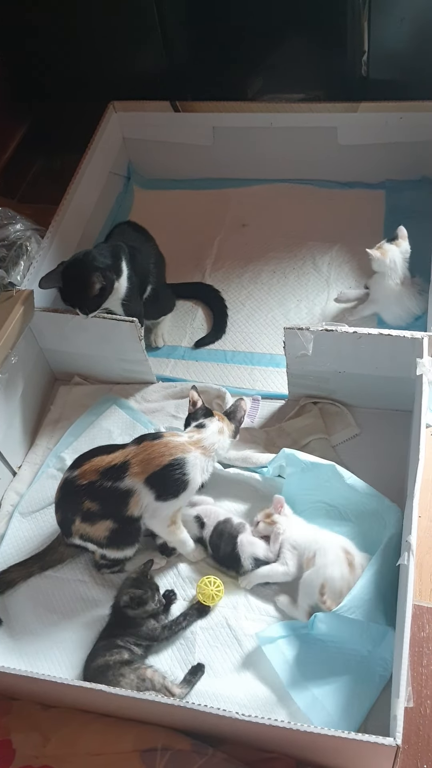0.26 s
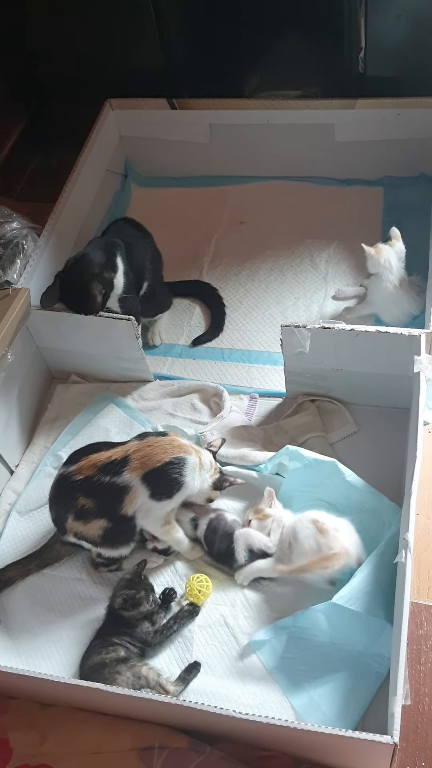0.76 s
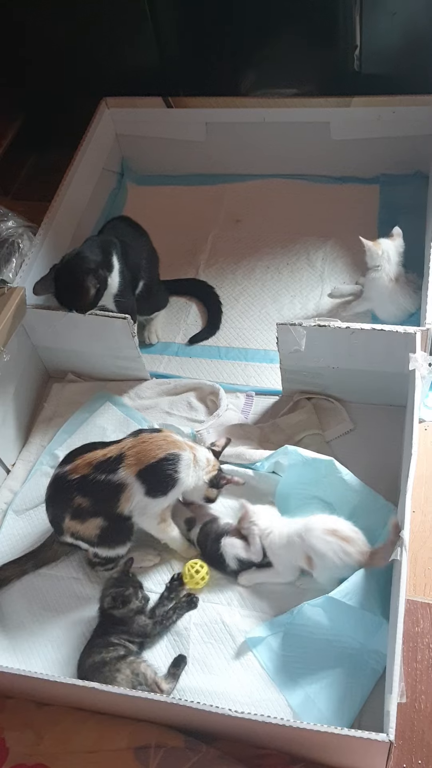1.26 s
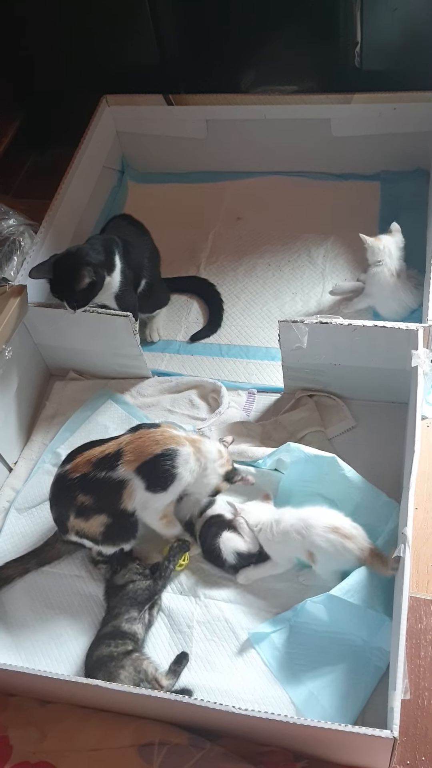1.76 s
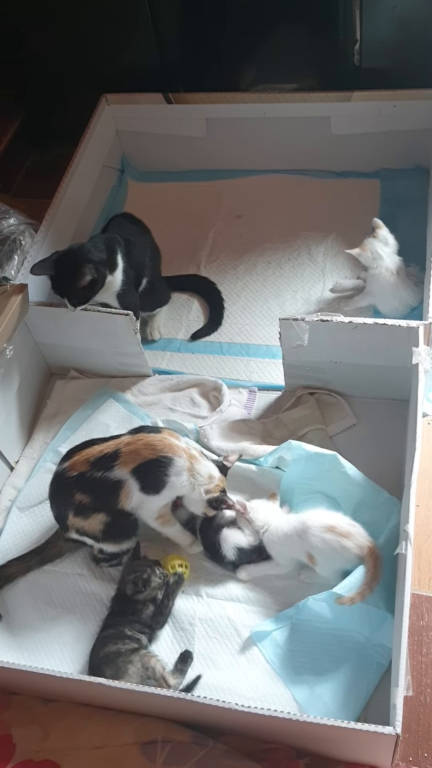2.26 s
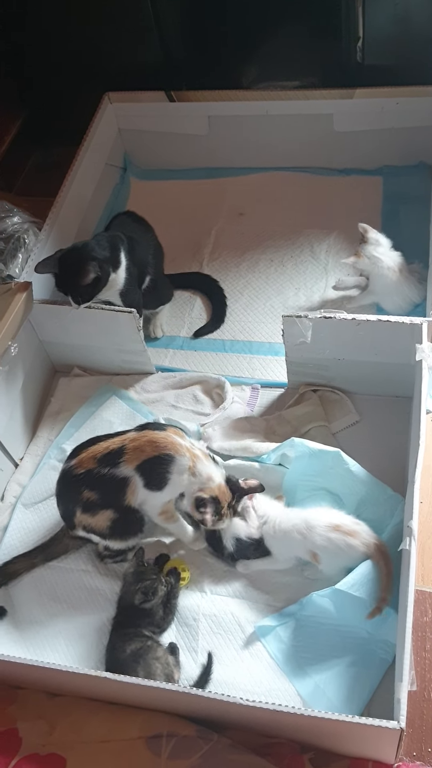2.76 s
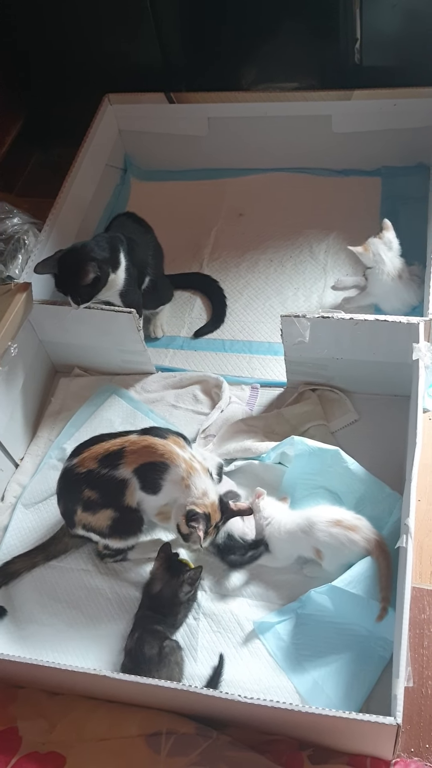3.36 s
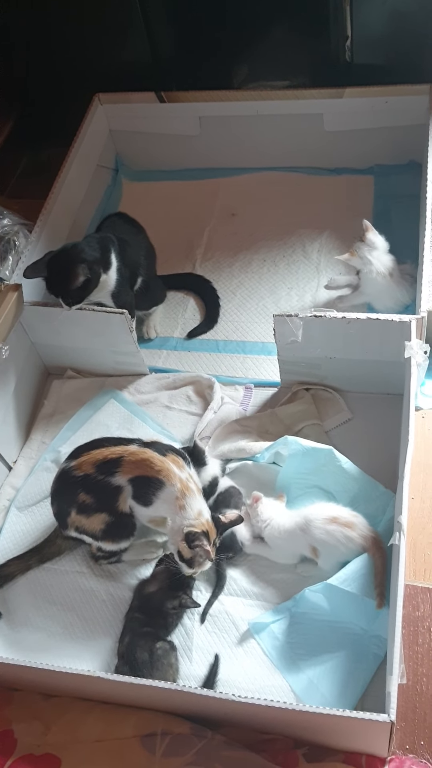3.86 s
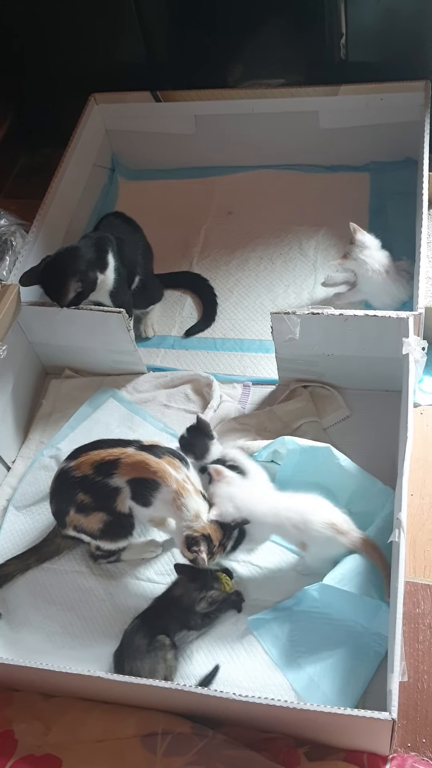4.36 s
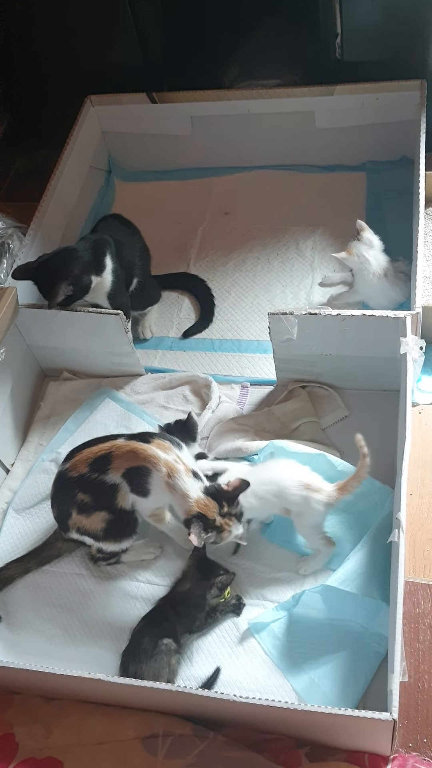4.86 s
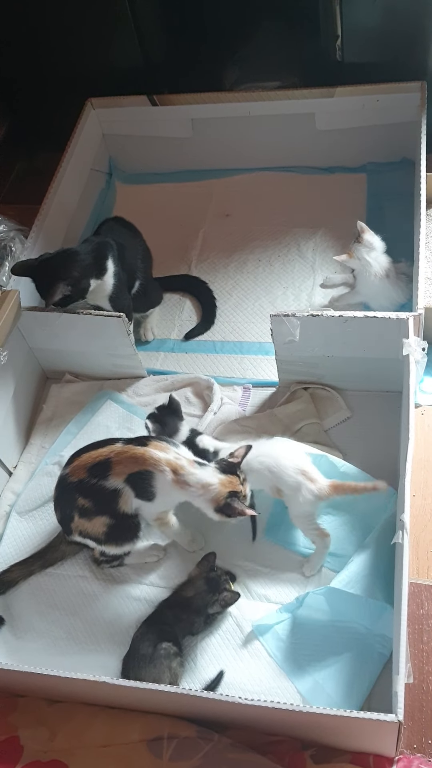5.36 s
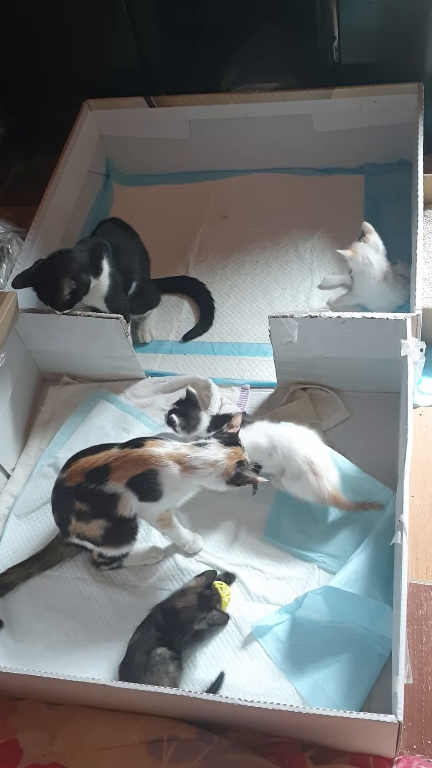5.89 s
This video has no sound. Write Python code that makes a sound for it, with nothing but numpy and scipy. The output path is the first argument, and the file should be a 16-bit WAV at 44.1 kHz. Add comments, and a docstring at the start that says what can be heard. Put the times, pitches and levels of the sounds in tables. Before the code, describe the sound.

Over the low hum of fans, kittens rustle on absorbent pads and knock a plastic bell ball, making light clinks and clacks.

```python
"""A pellet bell jingles inside a plastic lattice ball, batted by one of the kittens wrestling in a pen.
The pellet rings the bell and claws clack on the ball's cage. Paws and fur scuff crinkly absorbent pads,
the pen's cardboard is knocked and a dull rumble swells now and then. In the small room two motors,
probably fans, hum and beat against each other over a rush of air. The sound is stronger on the right."""
import sys
import numpy as np
from scipy import signal
from scipy.io import wavfile
from scipy.ndimage import uniform_filter1d

SR = 44100
rng = np.random.default_rng(int(sys.argv[2]) if len(sys.argv) > 2 else 0)


def wav_out(sig):
    """Save sig, one row per channel (or a flat mono array), as 16-bit PCM at SR to the path in sys.argv[1]."""
    wavfile.write(sys.argv[1], SR, np.round(np.clip(np.atleast_2d(sig).T, -1, 1) * 32767).astype(np.int16))


N = 270393
TIME = np.arange(N) / SR

# The bell's main note and its bright overtones. Each row: pitch in Hz, relative level in dB, t60 in seconds.
BELL_MODES = [(6000, -18, .18), (6490, -23, .12), (6828, 0, .105), (6845, -11, .16)]
OVERTONE_MODES = [(11570, -7, .11), (13480, -7, .09), (13620, -6, .1), (13820, 0, .13), (14100, -2.5, .13)]
# The pellet's dry tick. Each row: frequency in Hz, relative level in dB.
TICK_EQ = [(2000, -27), (5500, -15), (7500, 1), (11000, 2), (16000, -18)]


def ball():
    """The pellet strikes the bell and paws bat the cage; weaker bounces follow each blow."""
    # Hard pellet strikes. Each row: start in seconds, relative levels of main note and overtones in dB.
    jingles = [(0.1126, -56, -60), (0.183, -45.5, -62), (0.239, -47, -63), (0.3056, -46.5, -65),
               (0.3326, -43, -52.5), (0.671, -57, -63), (1.0166, -54.5, -61), (1.0831, -51, -58),
               (1.1348, -50, -58), (1.3614, -60, -58), (1.4193, -50.5, -70), (1.5048, -51, -68),
               (1.5337, -47.5, -50), (1.725, -50.5, -58), (1.7662, -70, -52), (1.8578, -59, -72),
               (2.0917, -60, -65), (2.4947, -52, -65), (2.5121, -39.5, -60), (2.5419, -44.5, -51),
               (2.6582, -50, -60), (2.708, -49.5, -60), (2.954, -64, -55), (2.9843, -47.5, -59),
               (3.0158, -48, -62), (4.2365, -52, -62), (4.2497, -47.5, -55), (4.366, -50, -58),
               (4.405, -50, -59), (4.513, -56, -51), (4.5556, -49, -62), (4.5919, -56, -71)]
    # Paw or claw hits. Each row: start in seconds, relative levels of cage ring and clack in dB.
    bats = [(.0994, -57, -72), (0.2705, -65, -51), (1.1147, -64, -70), (1.2742, -90, -54),
            (1.3614, -70, -58), (1.7262, -54.5, -56), (1.766, -56, -70), (1.8013, -59, -63),
            (2.5121, -68, -59), (2.5413, -55, -55), (2.6599, -59, -47), (2.7086, -60, -69),
            (2.954, -62, -57), (2.9853, -64, -63), (4.2527, -52.5, -44.5), (4.2746, -57.5, -66),
            (4.368, -52.5, -61), (4.556, -60.5, -47.5)]
    # A claw on plastic. Each row: frequency in Hz, relative level in dB.
    clack_eq = [(2000, -27), (3100, -16), (4600, 0), (7500, 2), (9500, 0), (13500, 3), (16000, -22)]
    bell, overtones, shell, ticks = rolling()
    for start, note_db, bright_db in jingles:
        add(bell, start, amp(note_db + 2) * ring(BELL_MODES, scatter_db=.7, detune=.0006))
        add(overtones, start, amp(bright_db - 3) * ring(OVERTONE_MODES, scatter_db=1.5, detune=.003))
        add(ticks, start, amp(note_db - 9) * click(TICK_EQ))
        for delay, gain in bounces():
            at = start + delay
            add(bell, at, gain * amp(note_db - 3.5) * ring(BELL_MODES, scatter_db=3, detune=.0076))
            shimmer = ring(OVERTONE_MODES, scatter_db=2, detune=.005)
            add(overtones, at, gain * amp(bright_db + 3) * shimmer)
            add(ticks, at, gain * amp(note_db - 7.5) * click(TICK_EQ))
    for start, cage_db, clack_db in bats:
        add(shell, start, amp(cage_db) * cage(detune=.007))
        add(ticks, start, amp(clack_db + 6) * click(clack_eq))
        for delay, gain in bounces():
            add(shell, start + delay, gain * amp(cage_db) * cage(detune=.0215))
    bell = chatter(bell, depth=.4, rate=500)
    shell = chatter(shell, depth=.8, rate=450)
    overtones = chatter(overtones, depth=.9, rate=700)
    return (room(bell, left_db=-9.5, wet_db=-6)
            + room(shell + overtones, left_db=-5.5, wet_db=-1.5)
            + room(ticks, left_db=-4.5, wet_db=-1.5))


def rolling():
    """The pellet tumbles lightly as the ball rolls, exciting four layers: bell, overtones, cage, ticks."""
    # Rolls of the ball. Each row: start, rise and hold in seconds, relative level in dB.
    rolls = [(0, 0.014, 0.29, -66.5), (.62, 0.046, 0.052, -73.5), (1.01, 0.016, 0.14, -66),
             (1.35, .03, 0.26, -67.5), (1.69, 0.019, .25, -67.5), (2.81, .02, 0.054, -64),
             (2.98, .02, .06, -65), (3.15, .02, .06, -64.5), (4.06, 0.022, .1, -62.5),
             (4.28, .05, 0.29, -65)]
    touches = unit(grains(rate=70, spread_db=3.5)) * bouts(rolls, release_s=.017)
    voices = [(0, ring(BELL_MODES, scatter_db=0, detune=.001)),
              (-7, ring(OVERTONE_MODES, scatter_db=0, detune=.003)),
              (-8, cage(detune=.005)),
              (-5.5, click(TICK_EQ))]
    return [amp(db) * signal.fftconvolve(touches, hit / np.linalg.norm(hit))[:N] for db, hit in voices]


def cage(detune):
    """One blow on the plastic cage, whose modes shift as it is pressed."""
    # Lowest and upper modes. Each row: pitch in Hz, relative level in dB, t60 in seconds.
    low_mode = [(2975, 0, .11)]
    upper_modes = [(3420, 1.5, .1), (4600, -7.5, .055), (5450, -15, .04), (6030, -13, .06),
                   (7540, -12, .05)]
    low = ring(low_mode, scatter_db=1.5, detune=detune / 2)
    upper = ring(upper_modes, scatter_db=1.5, detune=detune)
    return amp(-3) * low + amp(2.5) * upper


def bounces():
    """Delays in seconds and gains of the three ever weaker bounces after a blow."""
    delays = np.cumsum(rng.uniform(.007, .024, size=3))
    return zip(delays, amp(-11 - 3.2 * np.arange(3)))


def chatter(x, depth, rate):
    """The loose pellet buzzes against the ringing wall and roughens its tone."""
    return x * (1 + depth * wander(rate)) / np.sqrt(1 + depth ** 2)


def pads():
    """Paws drag over the padding while its film crackles; now and then a crease snaps."""
    # Paw and body scuffs. Each row: start, rise and hold in seconds, relative film and drag levels in dB.
    scuffs = [(0, 0.0067, 0.4, -70.5, -72.5), (.11, .05, .04, -63, -67.5), (.56, 0.028, .05, -66, -68),
              (.8, 0.031, 0.13, -65, -63), (1.09, 0.03, 0.027, -70, -83), (1.32, 0.019, 0.19, -66, -71),
              (1.43, 0.024, 0.014, -77, -61), (1.64, 0.016, 0.056, -70, -67.5),
              (1.79, 0.018, 0.057, -73, -87), (2.51, .02, 0.026, -66.5, -65),
              (2.655, 0.016, 0.025, -68, -71), (2.81, 0.016, 0.037, -66.5, -70.5),
              (2.96, 0.021, 0.026, -66, -72), (3.16, 0.048, 0.027, -71, -64),
              (3.32, 0.043, 0.024, -66.5, -67.5), (3.565, .01, .015, -71, -71),
              (3.83, 0.09, 0.3, -71.5, -73), (4.19, 0.014, 0.031, -56, -62),
              (4.33, 0.017, 0.028, -57.5, -66.5), (4.38, 0.016, 0.24, -69, -69.5),
              (5.095, 0.0052, 0.022, -80, -58.5), (5.7, 0.026, 0.099, -62.5, -57.5),
              (5.9, 0.14, 0.037, -63, -65)]
    # Sharp creases and catching claws. Each row: start in seconds, relative top and body levels in dB.
    snaps = [(.1524, -56, -66), (.303, -51, -74), (0.9537, -57, -60), (1.467, -54, -57), (1.532, -57, -75),
             (1.883, -51, -77), (2.9765, -53, -68), (3.571, -58, -74), (4.2107, -46, -50),
             (4.342, -50, -52), (4.352, -47, -66), (4.5054, -45.5, -71), (4.51, -46, -69),
             (5.1, -49.5, -79), (5.723, -57, -54), (5.7848, -63, -53)]
    # Tone of the film, the drag, a snap's top and its body. Each row: frequency in Hz, relative dB.
    film_eq = [(1500, -25), (3000, -1), (5000, -2), (6400, 5.5), (7500, 5.5), (10000, 1.5), (13500, 3),
               (16000, -5.5)]
    drag_eq = [(30, -17), (250, 11.5), (600, 8.5), (1400, 1.5), (2400, 2), (3500, -8), (6000, -10.5),
               (10000, -22)]
    top_eq = [(2000, -49), (5800, -7), (7300, 7), (10500, -0.5), (12500, -2), (16000, -16)]
    body_eq = [(600, -43), (2000, -39), (4500, 9), (7000, -6), (12000, -48)]
    film_floor_db, drag_floor_db = -87, -75  # fidgeting that never stops
    pressure = amp(2.87 * wander(rate=28))  # the paw presses unevenly
    crinkling = np.hypot(pressure * bouts(scuffs, release_s=.04, db_column=3), amp(film_floor_db))
    dragging = np.hypot(pressure * bouts(scuffs, release_s=.04, db_column=4), amp(drag_floor_db))
    film = colour(grains(rate=4000, spread_db=1.5), film_eq) * crinkling * amp(4.5)
    drag = colour(grains(rate=2200, spread_db=1.5), drag_eq) * dragging * amp(-1)
    creases = np.zeros(N)
    for start, top_db, body_db in snaps:
        add(creases, start, amp(top_db + 7.5) * click(top_eq))
        add(creases, start, amp(body_db + 3.5) * click(body_eq))
    return (room(film, left_db=-4.5, wet_db=-6)
            + room(creases, left_db=-5.5, wet_db=-4.5)
            + room(drag, left_db=-12, wet_db=1.5))


def cardboard():
    """A claw or paw strikes the pen: a knock and one broad, quickly damped resonance."""
    # Taps. Each row: start in seconds, panel and knock levels in dB, resonance and its width in Hz,
    # t60 in seconds.
    taps = [(1.647, -46.5, -50, 1020, 480, 0.041), (5.1, -48.5, -45, 2320, 1090, 0.11)]
    # First contact with the cardboard. Each row: frequency in Hz, relative level in dB.
    knock_eq = [(400, -8), (900, 6), (2400, -13), (3300, -27), (5200, 1), (8000, -20), (15000, -26)]
    out = np.zeros(N)
    for start, panel_db, knock_db, hz, width, t60 in taps:
        band = signal.butter(3, [hz - width / 2, hz + width / 2], "bandpass", fs=SR, output="sos")
        panel = unit(signal.sosfilt(band, rng.standard_normal(SR // 2))) * decay(t60)
        add(out, start, amp(panel_db) * panel + amp(knock_db) * click(knock_eq))
    return room(out, left_db=-4.5, wet_db=-4)


def rumble():
    """Soft low swells, perhaps bodies shifting on the floor of the pen."""
    # Swells. Each row: time of the peak in seconds, level in dB.
    swells = [(.193, -55.5), (.9, -55.5), (1.5, -60), (2.237, -55.5), (3.94, -58), (4.962, -53.5),
              (5.214, -58), (5.346, -52.5), (5.8, -58)]
    # Their dull tone. Each row: frequency in Hz, relative level in dB.
    rumble_eq = [(30, -33), (100, 0), (200, -8), (310, 4.5), (420, -4.5), (600, -13.5), (1200, -50)]
    envelope = sum(amp(db) * np.exp(-((TIME - peak) / .067) ** 2) for peak, db in swells)
    return room(colour(rng.standard_normal(N), rumble_eq) * envelope, left_db=-.5, wet_db=-22)


def motors():
    """The slower motor slips behind the faster; the hum swells each time they fall in step."""
    # The gap in speed between the motors. Each row: time in seconds, beat rate in Hz.
    beat_rate = [(0, 3.87), (1.1, 3.97), (1.8, 3.3), (2.6, 4.38), (3.3, 2.55), (3.9, 4.25), (5.1, 3.33),
                 (6.1, 4.2)]
    # Fader rides for the hum and for a low drone. Each row: time in seconds, relative level in dB.
    hum_ride = [(0, -51), (.75, -45), (1.5, -49), (2.5, -46.5), (3.33, -51), (3.7, -48), (5.2, -48.5),
                (5.9, -45.5)]
    drone_ride = [(0, -51.5), (.7, -49.5), (1.6, -57), (2.7, -53.5), (3.1, -75), (6.1, -56)]
    # Shaft tones an octave under the hum: relative levels in dB of the faster and the slower motor.
    shaft_db = [-56, -66]
    # Lesser motor tones. Each row: pitch in Hz, relative level in dB.
    side_tones = [(79.8, -71), (173.3, -66), (232.7, -68.5), (322, -78.5), (422.2, -72.5)]
    hum_hz, drone_hz, in_step_s = 116.7, 90.9, .113
    slip = np.cumsum(curve(beat_rate)) / SR
    slip -= np.interp(in_step_s, TIME, slip)
    fast = hum_hz * TIME + rng.random()  # phase in cycles
    slow = fast - slip
    pair = np.sin(2 * np.pi * fast) + amp(-2) * np.sin(2 * np.pi * slow)
    shafts = amp(shaft_db[0]) * np.sin(np.pi * fast) + amp(shaft_db[1]) * np.sin(np.pi * slow)
    out = pair * amp(curve(hum_ride)) + shafts
    for hz, db in side_tones + [(drone_hz, curve(drone_ride))]:
        drifting_phase = rng.random() + .00054 * hz * wander(rate=3.095)
        out += amp(db) * np.sin(2 * np.pi * (hz * TIME + drifting_phase))
    return np.sqrt(2) * out * pan(left_db=-10.5)


def air():
    """Fan air: a low rush, narrow in the bass and wide above, with a faint even hiss on top."""
    # Tone of the rush and of the hiss. Each row: frequency in Hz, relative level in dB.
    rush_eq = [(20, -32), (35, -5), (52, 1.5), (85, 4), (125, -4), (175, 3.5), (215, -6), (320, -2),
               (430, -8.5), (600, -14.5), (1000, -20), (1500, -22.5), (2600, -35.5), (4500, -43.5)]
    hiss_eq = [(1000, -0.5), (4000, -18), (6000, -10), (7600, 2.5), (10000, -4.5), (13500, -1),
               (16000, -10.5)]
    mono = np.fft.rfft(colour(rng.standard_normal(N), rush_eq))
    wide = np.fft.rfft(colour(rng.standard_normal((2, N)), rush_eq))
    mono_share = 1 / (1 + (np.fft.rfftfreq(N, 1 / SR) / 480) ** 2)
    rush = np.fft.irfft(mono * np.sqrt(mono_share) + wide * np.sqrt(1 - mono_share), N)
    hiss = colour(rng.standard_normal((2, N)), hiss_eq)
    rush *= amp(-53 + .79 * wander(rate=4.6))
    return rush * pan(left_db=-7.5) + amp(-73.5) * hiss * pan(left_db=-8.5)


def room(x, left_db, wet_db):
    """Direct on the right; a little later on the left, scattered by the pen; a short room tail on both."""
    tail = rng.standard_normal((2, SR // 2)) * decay(t60=.4) * (TIME[:SR // 2] > .003)
    tail /= np.linalg.norm(tail, axis=1, keepdims=True)
    scatter = rng.standard_normal(SR // 2) * decay(t60=.025)
    scatter /= np.linalg.norm(scatter)
    left = .55 * np.roll(x, 3) + .8 * signal.fftconvolve(x, scatter)[:N]
    reverb = signal.fftconvolve(x[None], tail, axes=1)[:, :N]
    return pan(left_db) * (np.array([left, x]) + amp(wet_db) * reverb)


def ring(modes, scatter_db, detune):
    """One blow on a set of modes; each blow lands on another spot and weights them anew."""
    out = 0
    for hz, db, t60 in modes:
        size, shift, phase = rng.standard_normal(3)
        tone = np.sin(2 * np.pi * (hz * (1 + detune * shift) * TIME[:SR // 2] + phase))
        out = out + amp(db + scatter_db * size) * decay(t60) * tone
    return out


def click(eq):
    """A brief contact: a crack of coloured noise."""
    return colour(rng.standard_normal(SR // 2), eq) * decay(t60=.011)


def grains(rate, spread_db):
    """Tiny clicks of very uneven size, about `rate` a second."""
    size = amp(spread_db * np.minimum(rng.exponential(size=N), 4.5))
    return (rng.random(N) < rate / SR) * size * rng.standard_normal(N)


def bouts(rows, release_s, db_column=3):
    """Envelope of movements that each rise, hold and die away; their powers add."""
    power = 0
    for row in rows:
        start, rise, hold = row[:3]
        age = TIME - start
        attack = np.clip(age / rise, 0, 1)
        release = np.exp(-np.clip((age - rise - hold) / release_s, 0, 20))
        power = power + (amp(row[db_column]) * attack * release) ** 2
    return np.sqrt(power)


def colour(x, eq):
    """Shape a signal with an EQ curve of (Hz, dB) points; rms 1."""
    hz, db = np.transpose(eq)
    bins_hz = np.maximum(np.fft.rfftfreq(x.shape[-1], 1 / SR), 1)
    gain = amp(np.interp(np.log(bins_hz), np.log(hz), db))
    return unit(np.fft.irfft(np.fft.rfft(x) * gain, x.shape[-1]))


def wander(rate):
    """Smooth random motion through `rate` values a second; rms 1."""
    span = int(SR / rate)
    steps = np.repeat(rng.standard_normal(N // span + 1), span)
    return unit(uniform_filter1d(uniform_filter1d(steps, span), span)[:N])


def curve(rows):
    """Join (seconds, value) points with straight lines."""
    return np.interp(TIME, *np.transpose(rows))


def decay(t60):
    """Half a second of exponential decay, falling 60 dB in t60 seconds."""
    return np.exp(-np.log(1000) * TIME[:SR // 2] / t60)


def add(track, start_s, sound):
    """Mix a sound into a track."""
    i = max(int(start_s * SR), 0)
    track[i:i + len(sound)] += sound[:max(N - i, 0)]


def pan(left_db):
    """Stereo gains with mean 1, the left set relative to the right."""
    gains = np.array([[amp(left_db)], [1]])
    return gains / gains.mean()


def amp(db):
    """Decibels to gain."""
    return 10 ** (np.asarray(db) / 20)


def unit(x):
    """Scale to rms 1."""
    return x / np.sqrt(np.mean(x ** 2))


def scene():
    """The kittens' play over a bed of hum and air."""
    return ball() + pads() + cardboard() + rumble() + motors() + air()


def record(dry):
    """A steep high cut at 16.1 kHz."""
    return signal.sosfilt(signal.ellip(10, .2, 80, 16100, fs=SR, output="sos"), dry)


dry = scene()
out = record(dry)
wav_out(out)
```